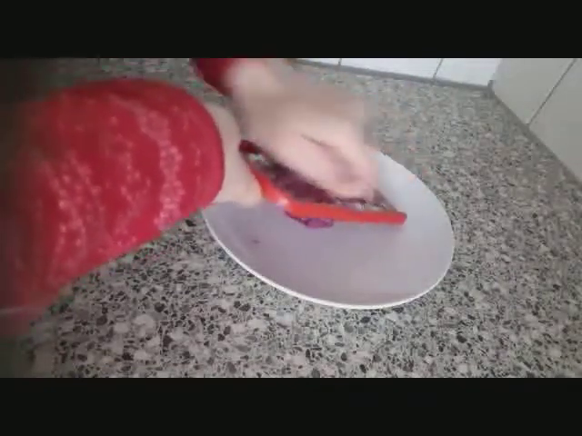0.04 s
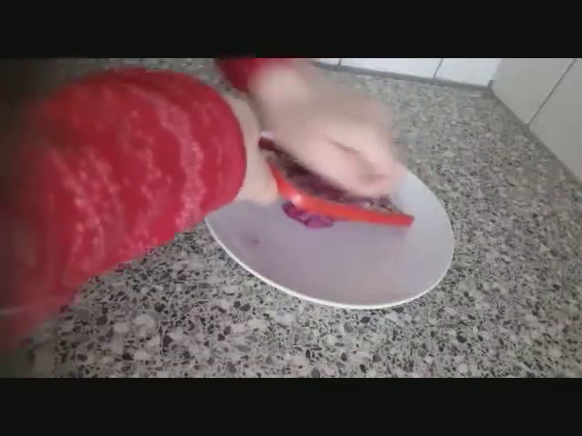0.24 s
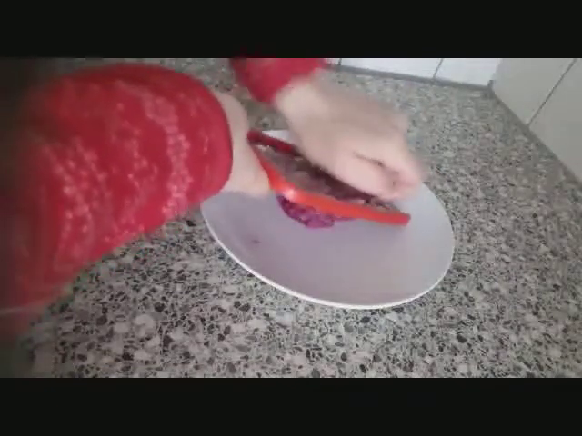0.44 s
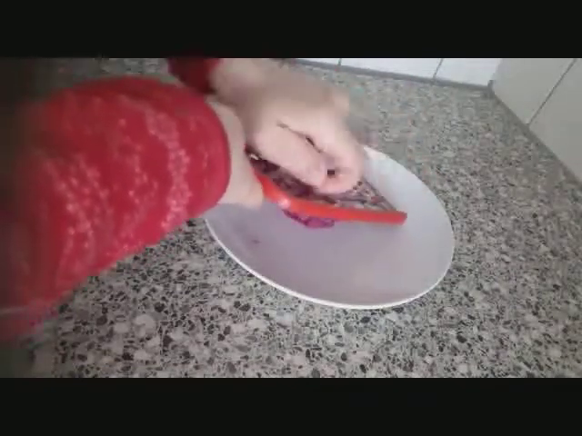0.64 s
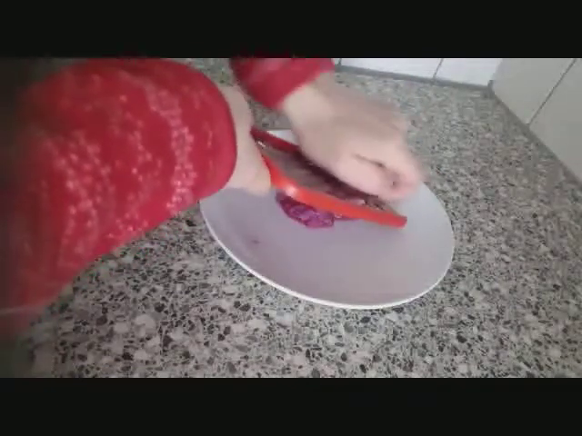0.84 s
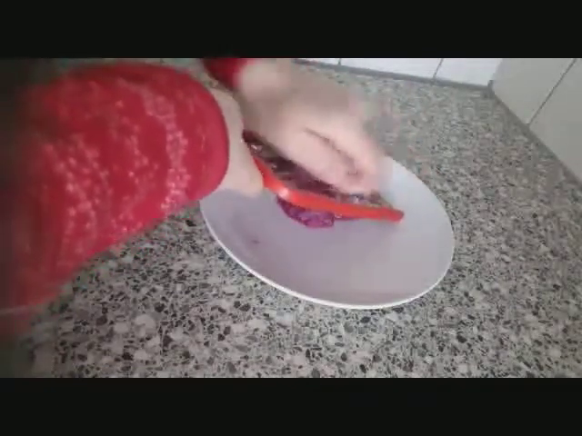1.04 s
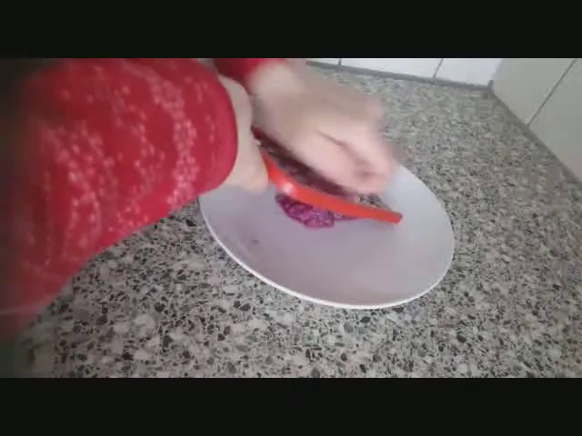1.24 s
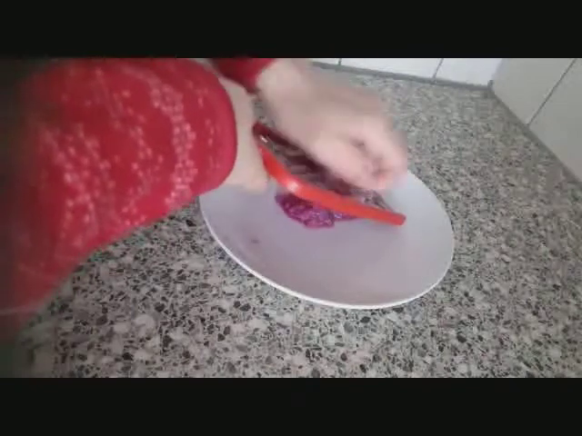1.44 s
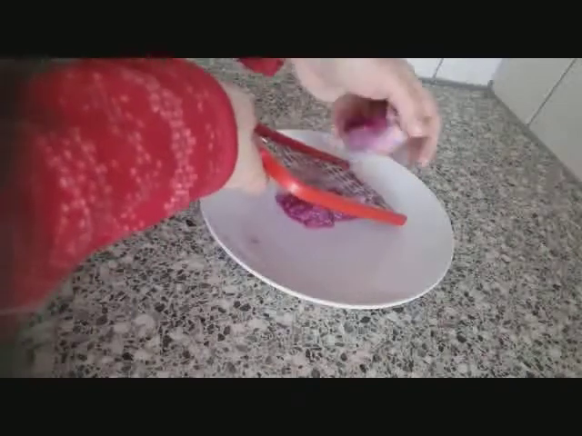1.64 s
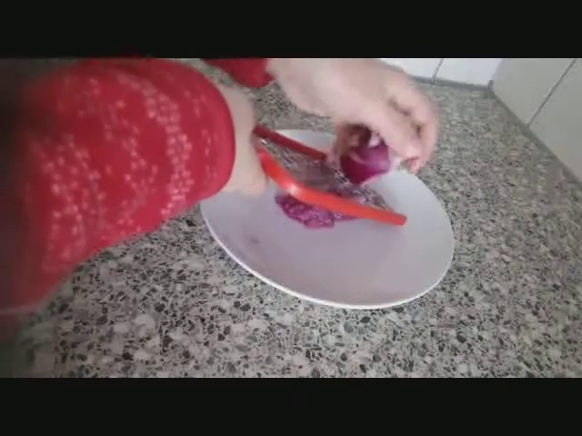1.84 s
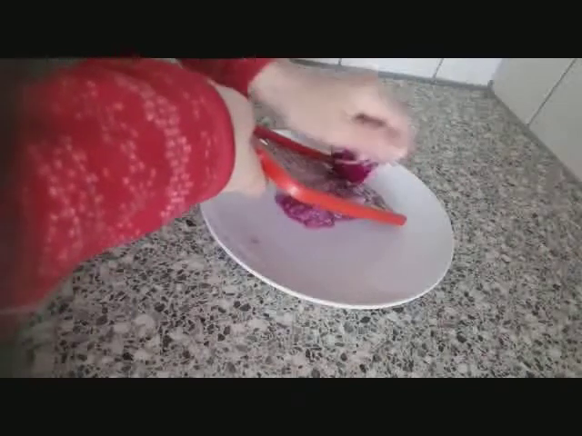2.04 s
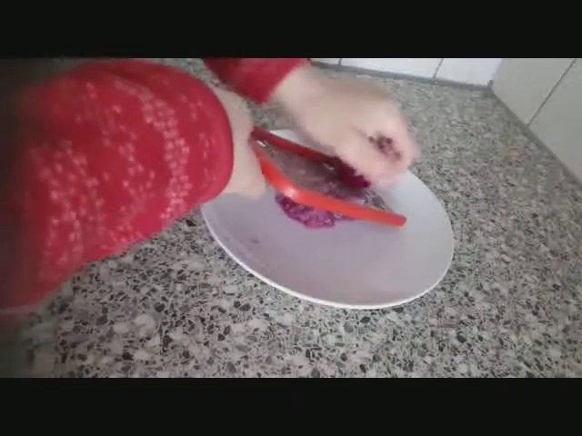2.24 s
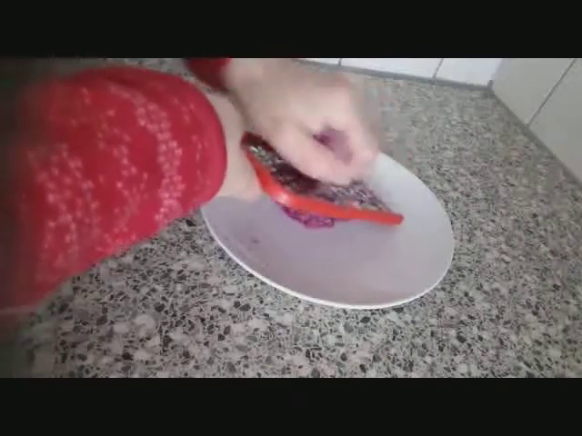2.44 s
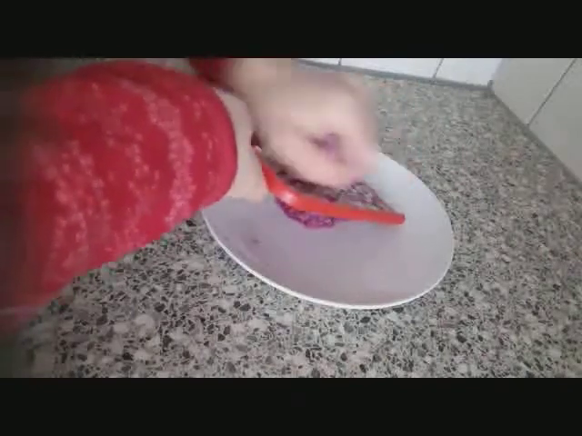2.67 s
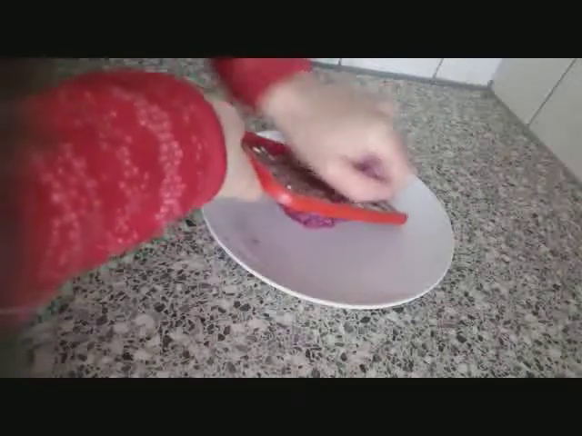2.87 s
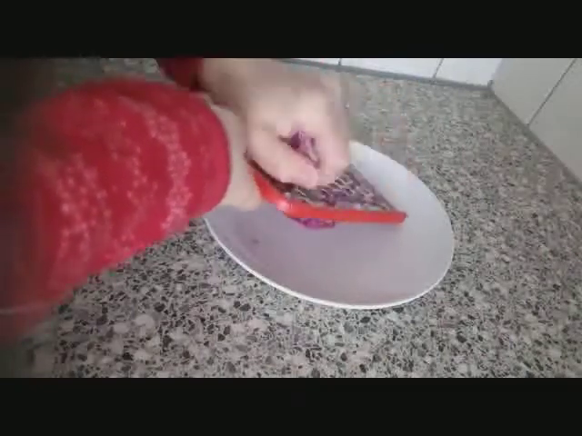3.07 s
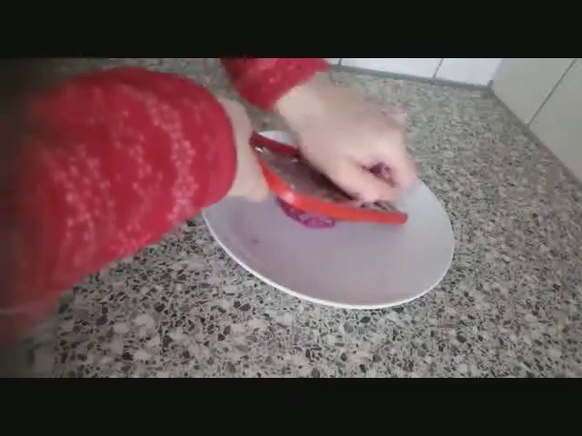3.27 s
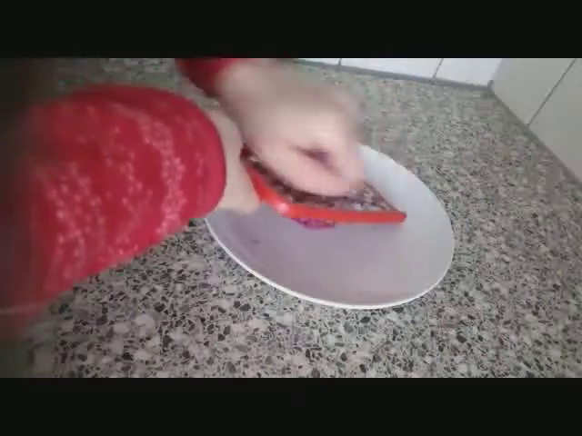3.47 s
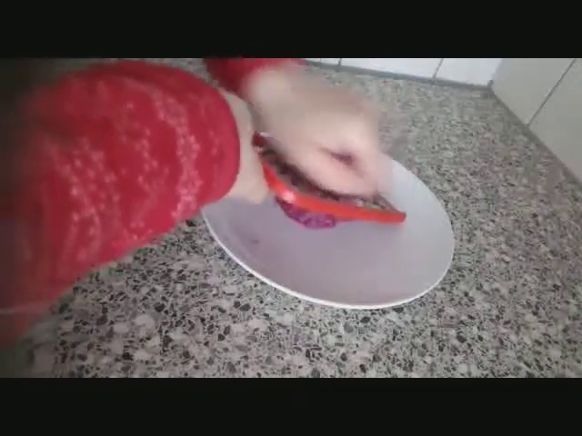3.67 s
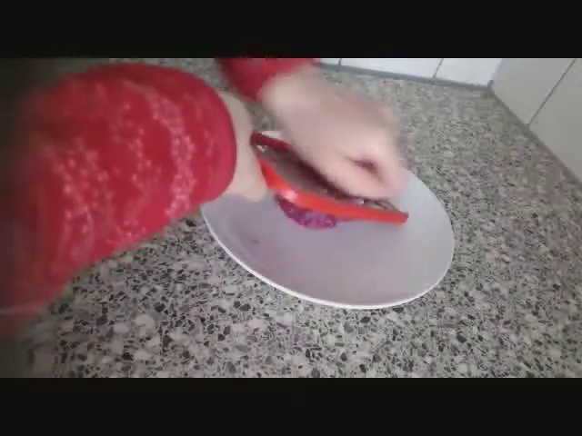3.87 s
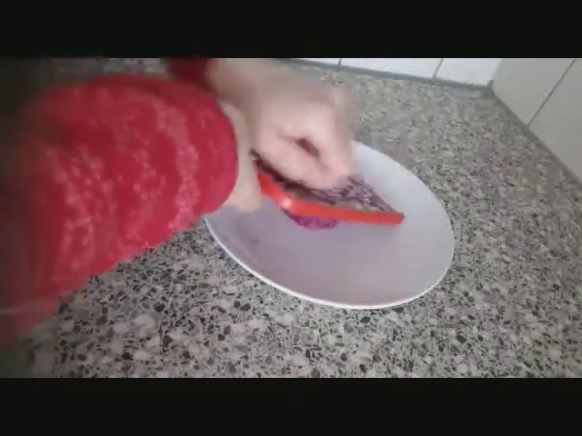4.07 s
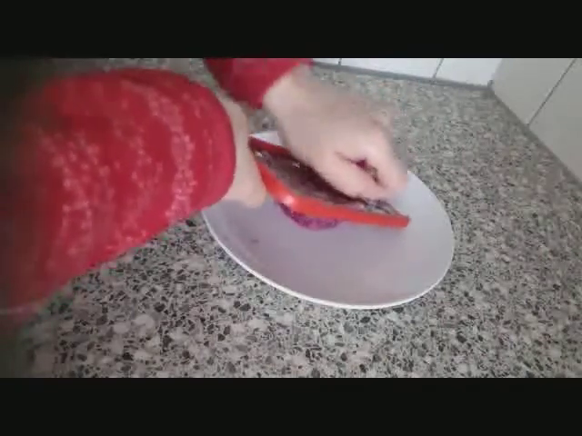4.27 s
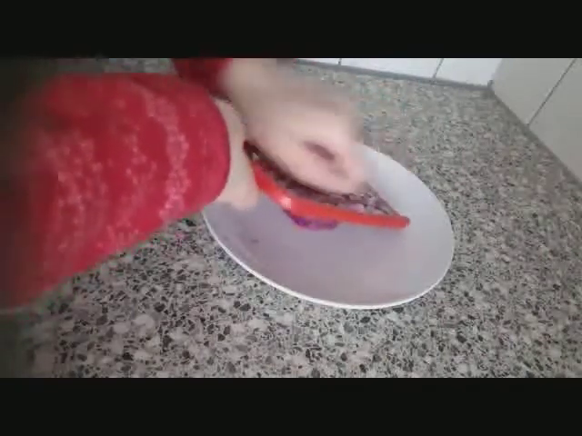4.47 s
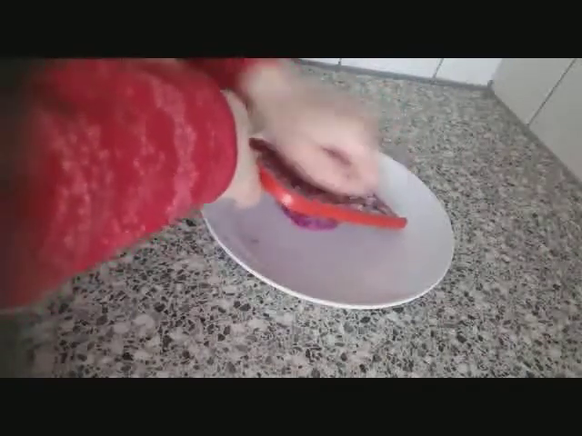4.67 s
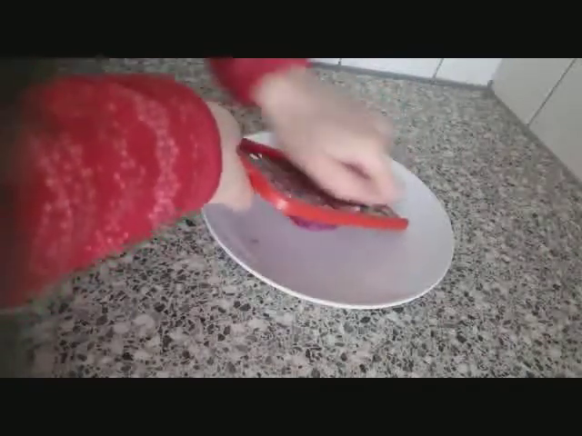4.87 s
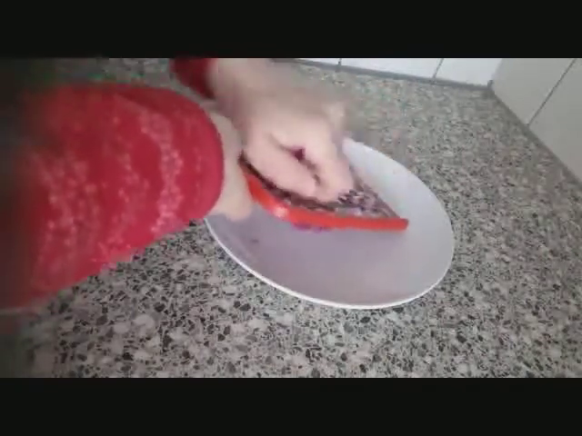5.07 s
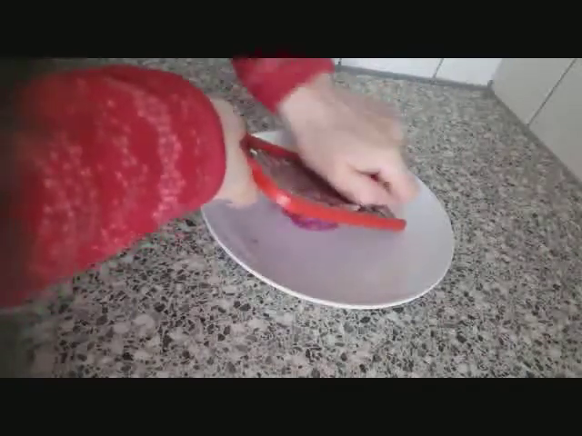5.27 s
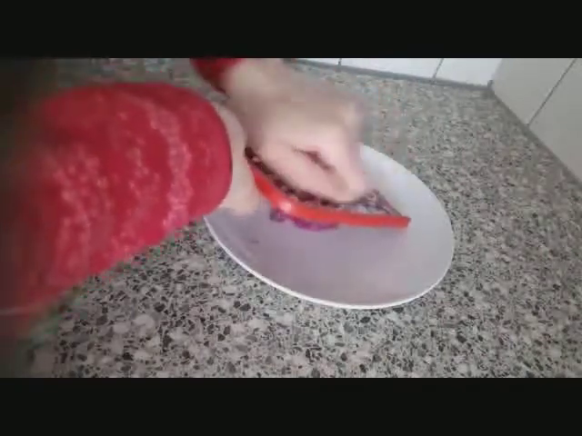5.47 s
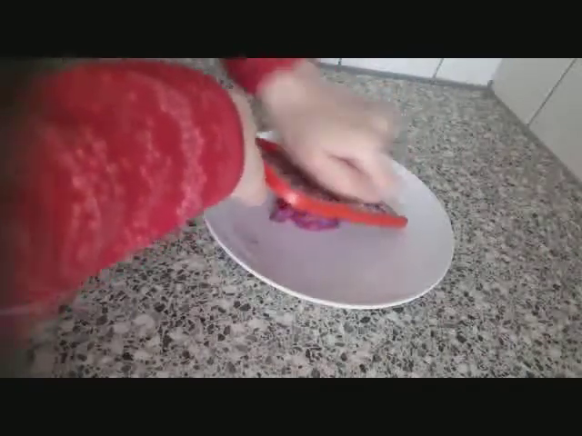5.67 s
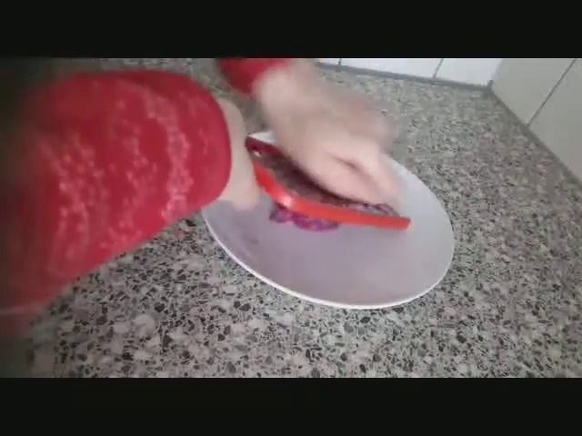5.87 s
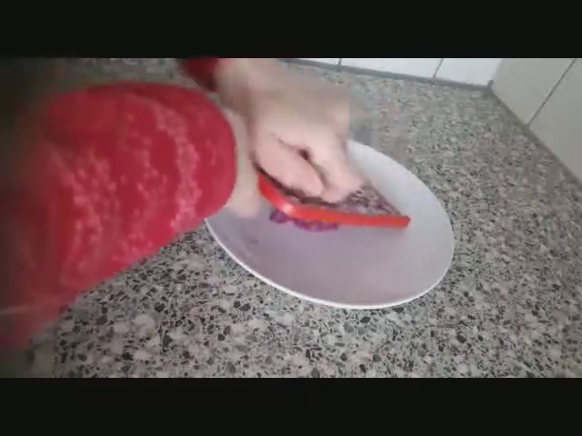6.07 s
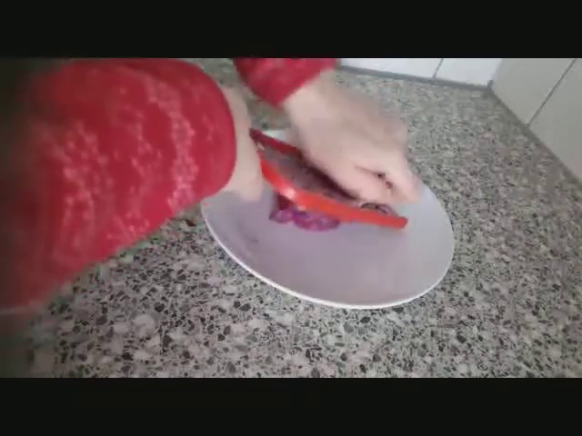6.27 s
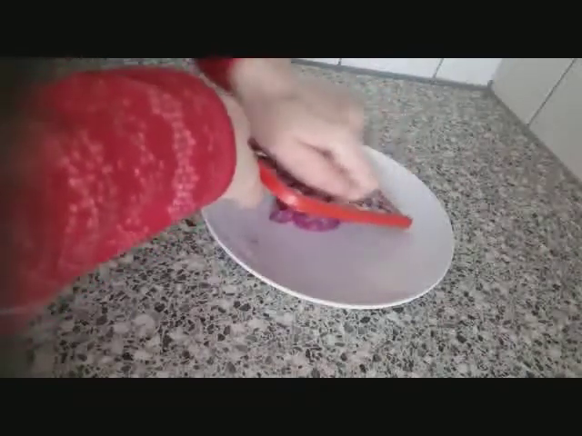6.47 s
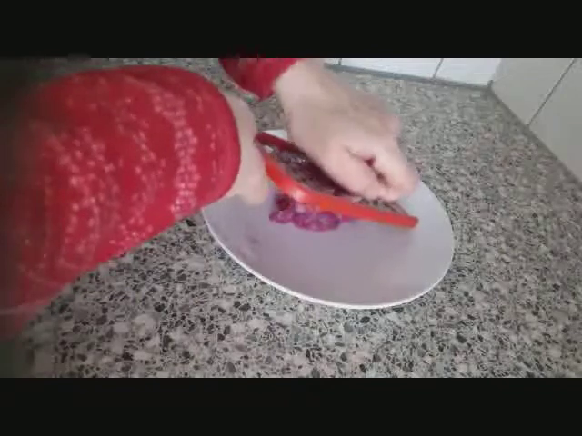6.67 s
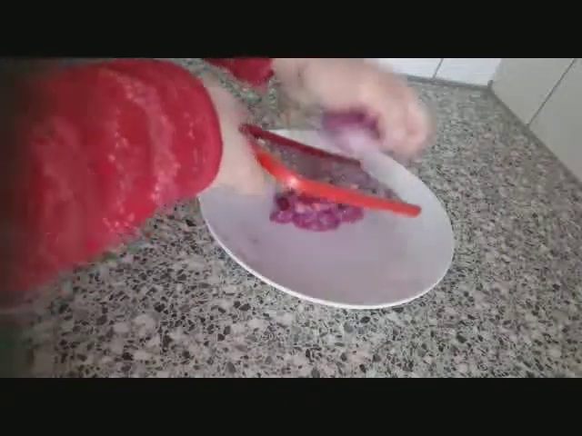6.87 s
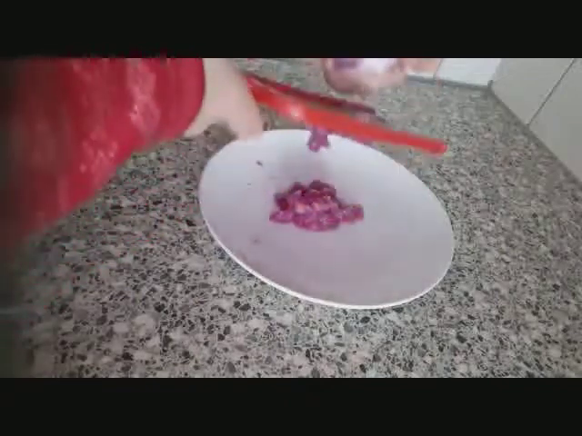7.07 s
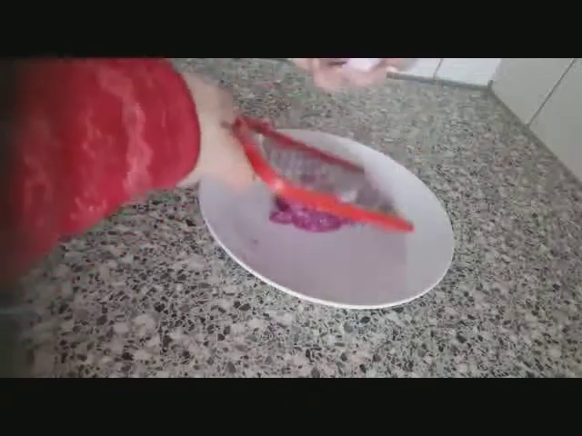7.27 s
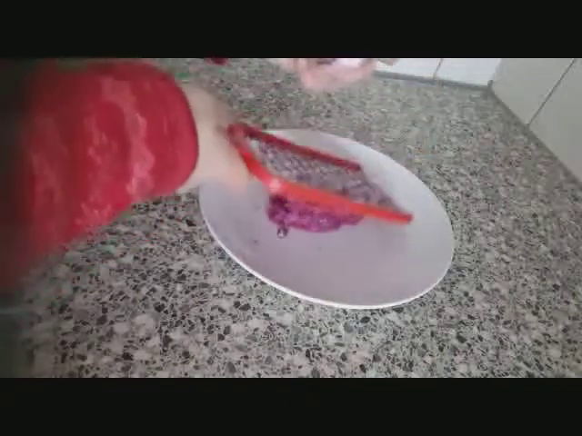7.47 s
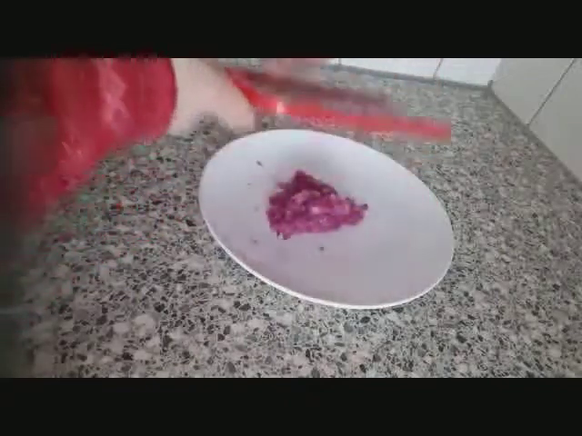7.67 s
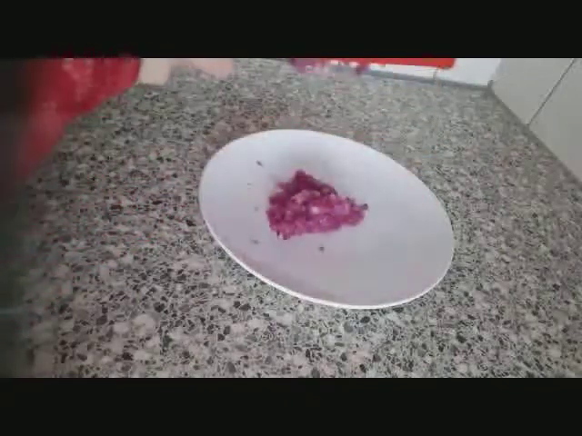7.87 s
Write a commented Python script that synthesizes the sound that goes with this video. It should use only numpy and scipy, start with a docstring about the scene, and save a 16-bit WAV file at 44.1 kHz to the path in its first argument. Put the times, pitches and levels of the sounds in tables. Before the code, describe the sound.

In a small, hard-walled kitchen, close wet rasping strokes run back and forth as an onion is grated over a plate, with a low shudder underneath. After a short break with a few tiny ticks, a longer run of grating follows. It stops with a soft bump, and the grater clacks twice on the briefly ringing plate, over a faint household rumble and hiss.

```python
"""A dense, wet rasp, to and fro, close to the microphone: an onion on a flat grater in a small hard kitchen.
The teeth tear the flesh while the rows of holes make the grater judder, along with the plate it rests on
and the stone counter below. The onion is turned in a pause, with small wet ticks, and the grating goes on.
At the end comes a soft bump, then the grater is knocked twice on the plate.
A short echo follows it all, over a low household rumble and hiss."""
import sys
import numpy as np
from scipy import signal
from scipy.fft import rfft, irfft
from scipy.io import wavfile

SR = 44100
rng = np.random.default_rng(int(sys.argv[2]) if len(sys.argv) > 2 else 0)


def unload_wav(signal):
    """Save mono or channel-first audio to the path in sys.argv[1] as 16-bit WAV at rate SR, clipped to [-1, 1]."""
    wavfile.write(
        sys.argv[1],
        SR,
        np.round(np.clip(np.atleast_2d(signal).T, -1, 1) * 32767).astype(np.int16),
    )


N = 348831


def from_db(db):
    return 10 ** (np.asarray(db) / 20)


def unit_rms(x):
    return x / np.sqrt(np.mean(x ** 2) + 1e-20)


def in_time(rows):
    """Rows led by a time become columns that glide from sample to sample."""
    times, *columns = np.transpose(rows)
    return [np.interp(np.arange(N) / SR, times, column) for column in columns]


def at_hz(points, hz):
    """A curve's value at a frequency, on a log axis."""
    return np.interp(np.log(hz), np.log(np.array(points)[:, 0]), np.array(points)[:, 1])


def butter(x, hz, kind="band", order=2):
    return signal.sosfilt(signal.butter(order, hz, kind, fs=SR, output="sos"), x)


def drift(rate_hz):
    """Random wavering of RMS 1: noise twice through a one-pole low-pass."""
    pole = np.exp(-2 * np.pi * rate_hz / SR)
    return unit_rms(signal.lfilter([1], [1, -2 * pole, pole * pole], rng.standard_normal(N + SR))[SR:])


def colour(x, spectrum):
    """Minimum-phase filter that follows a curve of (Hz, dB) points."""
    cepstrum = irfft(np.log(from_db(at_hz(spectrum, np.linspace(1, SR / 2, 4097)))))
    cepstrum[1:4096] *= 2
    cepstrum[4097:] = 0
    impulse = irfft(np.exp(rfft(cepstrum)))
    return signal.fftconvolve(x, np.atleast_2d(impulse), axes=-1)[:, :N]


def grains(per_s, uneven_db):
    """Random clicks of uneven size, in two channels that share the moments but not the signs."""
    sizes = from_db(uneven_db * np.minimum(rng.exponential(1, N), 5))
    fires = rng.random(N) < per_s / SR
    return sizes * fires * rng.standard_normal((2, N)) + 1e-18


def ring(clicks, modes, scatter_db=0.):
    """Clicks set damped modes ringing; with scatter, each strikes each mode with its own strength."""
    out, hits = 0, np.flatnonzero(np.abs(clicks) > 1e-12)
    for hz, level_db, t60 in modes:
        decay, angle = from_db(-60 / (t60 * SR)), 2 * np.pi * hz / SR
        struck = clicks * from_db(level_db) + 1e-18
        if scatter_db:
            struck[hits] *= from_db(scatter_db * rng.standard_normal(len(hits)))
        out = out + signal.lfilter([0, np.sin(angle)], [1, -2 * decay * np.cos(angle), decay ** 2], struck)
    return out


# How alike the microphone's two sides are. Each row: frequency in Hz, correlation (below 0 counts as 0).
MIC_LIKENESS = [(60, 1), (180, 0.98), (550, 0.72), (1650, 0.097), (4970, 0.36), (15000, -0.35)]
# The balance at the microphone. Each row: frequency in Hz, left minus right in dB.
MIC_BALANCE = [(60, 6.5), (120, -2), (240, -1.5), (480, -2), (950, 0), (1890, 0), (3770, -1), (7520, 1.5),
               (15000, -6)]


def spread(pair):
    """Two unrelated signals become left and right, alike in the bass and less so higher up."""
    hz = np.linspace(1, SR / 2, N // 2 + 1)
    alike = np.clip(at_hz(MIC_LIKENESS, hz), 0, 1)
    lean = from_db(at_hz(MIC_BALANCE, hz) / 2)
    mid, side = rfft(pair) * np.sqrt([(1 + alike) / 2, (1 - alike) / 2])
    return irfft([(mid + side) * lean, (mid - side) / lean], N)


# The rumble and the hiss of the house. Each row: frequency in Hz, relative level in dB.
RUMBLE_SPECTRUM = [(24, -48.5), (40, -18.5), (113, 3), (183, -18), (241, -0.5), (269, -19), (310, -10.5),
                   (399, -23), (614, -28.5), (700, -35), (910, -65), (1540, -120)]
HISS_SPECTRUM = [(350, -28.5), (600, -5.5), (661, -21), (858, -6.5), (1140, -14), (2090, -1), (2310, -14),
                 (2950, -19.5), (3940, -14.5), (4910, -3), (5790, -11.5), (6920, -3), (8270, -31),
                 (12300, -13.5), (16000, -12)]
# Their rise and fall. Each row: time in seconds, rumble level in dB, hiss level in dB.
ROOM_LEVELS = [(0, -45, -44), (1.6, -63.5, -61), (1.8, -54.5, -59.5), (2.0, -53, -58), (2.2, -61, -60.5),
               (6.8, -55.5, -60.5), (6.95, -57, -57.5), (7.15, -59.5, -62.5), (7.7, -64, -65.5),
               (7.9, -61, -65)]


def room_tone():
    """All around the microphone, a low household rumble that wavers and a steadier hiss."""
    rumble_db, hiss_db = in_time(ROOM_LEVELS)
    rumble = unit_rms(spread(colour(rng.standard_normal((2, N)), RUMBLE_SPECTRUM)))
    hiss = unit_rms(spread(colour(rng.standard_normal((2, N)), HISS_SPECTRUM)))
    return from_db(rumble_db + 4.3 * drift(16)) * rumble + from_db(hiss_db + .8 * drift(5.4)) * hiss


# The kitchen's echo. Each row: frequency in Hz, seconds to fade by 60 dB.
KITCHEN_DECAY = [(100, 0.3), (1000, 0.29), (5000, 0.26), (12000, 0.26)]
FIRST_ECHO_S = 0.0072


def kitchen_echo(x):
    """Off hard walls nearby, echoes thicken at once into noise that dies octave by octave."""
    t, tail = np.arange(SR // 2) / SR, 0
    mid, side = rng.standard_normal((2, len(t)))
    for low_hz in 62.5 * 2 ** np.arange(8):
        centre_hz = low_hz * np.sqrt(2)
        alike = np.clip(at_hz(MIC_LIKENESS, centre_hz), 0, 1)
        pair = np.sqrt(1 + alike) * mid + np.sqrt(1 - alike) * side * [[1], [-1]]
        fade = from_db(-60 * t / at_hz(KITCHEN_DECAY, centre_hz))
        tail = tail + butter(pair, [low_hz, 2 * low_hz]) * fade
    tail = tail * (t > FIRST_ECHO_S)
    return signal.fftconvolve(x[None], tail / np.sqrt(np.sum(tail ** 2) / 2), axes=-1)[:, :N]


# Modes of the plate, of plate and grater rocking on the counter, and of the stone counter itself.
# Each row: frequency in Hz, relative level in dB, seconds to fade by 60 dB.
PLATE_MODES = [(780, -23, 0.28), (815, -25, .12), (965, -22, 0.12), (1330, -19.5, .1), (1647, -15, .12),
               (2030, -4.5, 0.056), (2621, -9, 0.17), (2640, -12.5, .12), (2880, -13, .07),
               (3395, -16, .08), (3708, -8.5, .08), (4290, -12, .08), (4420, -8, .15), (4504, -9, .13),
               (4556, -7, .14), (4614, -10, .11), (4750, -17, .08), (4975, -11, .1), (5290, -17.5, .08),
               (5550, -18.5, .08), (6186, -11, 0.08), (6244, -9, .14), (6295, -13, 0.11), (6650, -20, .06),
               (6900, -26, .08), (8360, -33, .1)]
ROCKING_MODES = [(104.2, 3, 0.17), (222, -7, 0.032), (333, -8, 0.046), (404.4, -9.5, 0.049),
                 (525.2, -17, 0.096)]
COUNTER_MODES = [(190, 1.5, 0.017), (298.5, -0.5, 0.11), (435.5, -2, 0.057)]
# The crack of grater on plate. Each row: frequency in Hz, relative level in dB.
CRACK_SPECTRUM = [(180, -35.5), (300, -2.5), (801, -6), (1460, -10.5), (1640, -29), (1780, -10), (3640, -4),
                  (5700, -2.5), (6200, 1), (8500, -31), (16000, -27.5)]
# The grater's knocks and bounces, close up. Each row: start in seconds, relative levels of ring,
# crack and thump in dB, hardness in Hz, left minus right in dB.
KNOCK_HITS = [(2.234, -39, -43, -38, 3000, -1), (6.868, 6, -38, -53, 260, -1.5),
              (7.231, -5, -13.5, -29, 12000, 7), (7.2368, -4, -10, -22.5, 16000, -2),
              (7.4613, -5.5, -14, -26, 15900, -6), (7.4635, -22, -12, -21.5, 8500, 3),
              (7.469, -19, -17.5, -20, 7500, -2.5)]


def knocks():
    """Each contact, longer for a soft blow, cracks, rings the plate and thumps into the counter."""
    blows, thumps, cracks = np.zeros(N), np.zeros(N), np.zeros((2, N))
    t = np.arange(SR // 10) / SR
    noises = rng.standard_normal((len(KNOCK_HITS), 2, len(t)))
    for (start, ring_db, crack_db, thump_db, hardness_hz, _), noise in zip(KNOCK_HITS, noises):
        i = round(start * SR)
        contact = (t + 1 / SR) * np.exp(-2 * np.pi * hardness_hz * t)
        pulse = contact / contact.sum()
        noise[:, 0] = 1.3   # the first touch is one sharp click
        burst = signal.fftconvolve(noise * np.exp(-t / 0.0034), pulse[None], axes=-1)[:, :len(t)]
        blows[i:i + len(t)] += from_db(ring_db) * pulse
        cracks[:, i:i + len(t)] += from_db(crack_db) * burst
        thumps[i] = from_db(thump_db)
    clack = from_db(-13.5) * ring(blows, PLATE_MODES) + from_db(17.5) * colour(cracks, CRACK_SPECTRUM)
    thud = ring(thumps, ROCKING_MODES) + ring(thumps, COUNTER_MODES)
    return butter(clack, 95, "high"), butter(thud, 95, "high")   # small bodies radiate no deep bass


# Close to the microphone: wet ticks as the onion is turned, sharp bites within strokes,
# and the small click of the grater's soft bump on the plate.
# Each row: start in seconds, peak level in dB, pitch in Hz, peak level of the snap in dB.
SMALL_TICKS = [(1.9035, -51, 2060, -54), (2.002, -38, 5630, -44), (2.011, -54, 3980, -46),
               (2.217, -51, 4850, -59), (2.2308, -41, 4680, -37), (2.2559, -44, 4700, -44),
               (2.3303, -38, 2350, -22), (2.6749, -26, 4500, -30), (4.5638, -12, 4300, -24),
               (5.3985, -18, 4570, -9), (5.7135, -25, 4300, -23), (6.8699, -42.5, 1900, -51)]
TICK_DECAY_S, SNAP_DECAY_S, SNAP_FROM_HZ = 0.0098, 0.0014, 1600


def small_ticks():
    """Each tick is a few milliseconds of noise around its pitch, headed by a short bright snap."""
    out, t = np.zeros(N), np.arange(SR // 10) / SR
    for start, tick_db, hz, snap_db in SMALL_TICKS:
        noise = rng.standard_normal(len(t))
        burst = butter(noise * np.exp(-t / TICK_DECAY_S), [hz / 1.46, min(hz * 1.33, SR / 3)])
        snap = butter(noise * np.exp(-t / SNAP_DECAY_S), SNAP_FROM_HZ, "high")
        for part, peak_db in (burst, tick_db), (snap, snap_db):
            out[round(start * SR):][:len(t)] += from_db(peak_db) * part / np.abs(part).max()
    return out


# The onion's strokes, to and fro in turn. A crest is the share of a stroke (0-1) where a layer peaks.
# Each row: start in seconds, length in seconds, rasp crest, rasp level in dB, juice spray and frame
# scrape in dB relative to the rasp, pitch of the free blade in Hz, judder crest, judder level in dB,
# rocking crest, rocking level in dB.
ONION_STROKES = [(-0.08, 0.13, 0.58, -28, -9, -5.5, 4500, 0.44, -35.5, 0.76, -35.5),
                 (0.052, 0.19, 0.61, -28.5, -10.0, -8, 4530, 0.56, -39, 0.5, -34.5),
                 (0.264, 0.12, 0.53, -28, -11, -4, 4300, 0.38, -30, 0.57, -34.1),
                 (0.385, 0.18, 0.61, -27.5, -10.5, -5, 4250, 0.71, -29, 0.56, -37.5),
                 (0.576, 0.14, 0.58, -29.5, -10.5, -4.5, 4500, 0.51, -33.5, 0.32, -30),
                 (0.725, 0.16, 0.65, -26.5, -12, -7, 4460, 0.63, -33, 0.3, -40),
                 (0.908, 0.15, 0.59, -31, -9, -2.5, 4520, 0.57, -31.5, 0.54, -33.5),
                 (1.058, 0.17, 0.59, -29, -10.9, -4.5, 4580.0, 0.67, -33, 0.6, -31.9),
                 (1.236, 0.15, 0.53, -31, -9, -4.5, 4530.0, 0.48, -31, 0.53, -37),
                 (1.397, 0.13, 0.44, -40.5, -10.5, -6, 4740.0, 0.58, -47, 0.44, -48),
                 (2.202, 0.086, 0.76, -42, -3.5, -5.5, 4720.0, 0.67, -41.5, 0.4, -30),
                 (2.304, 0.17, 0.51, -30, -6.5, -9, 4820.0, 0.43, -31, 0.36, -31.5),
                 (2.467, 0.17, 0.67, -26.5, -9, -9.5, 3920, 0.54, -33, 0.57, -33),
                 (2.634, 0.19, 0.6, -28, -8.5, -12, 4540, 0.56, -34, 0.7, -29.5),
                 (2.816, 0.18, 0.57, -25.5, -9.5, -8, 4380, 0.53, -27, 0.55, -25),
                 (3.004, 0.15, 0.51, -29, -8.5, -11, 4370, 0.39, -33, 0.65, -29.5),
                 (3.135, 0.19, 0.6, -24.5, -10, -7, 3970, 0.69, -27, 0.59, -27),
                 (3.335, 0.15, 0.53, -27.5, -8.5, -11.5, 4040, 0.35, -33, 0.5, -34),
                 (3.478, 0.19, 0.63, -26.0, -9.5, -6.5, 4200, 0.66, -31, 0.42, -30),
                 (3.685, 0.14, 0.47, -30, -8, -11.5, 4700.0, 0.39, -31, 0.36, -33.5),
                 (3.819, 0.18, 0.66, -25.5, -10.5, -6.5, 3660, 0.69, -31, 0.57, -25.5),
                 (4.014, 0.15, 0.56, -29.5, -7.5, -10.5, 4000, 0.43, -34.5, 0.37, -36),
                 (4.157, 0.18, 0.66, -28.5, -10.5, -10, 4150.0, 0.67, -35.1, 0.73, -30.5),
                 (4.357, 0.14, 0.51, -32.5, -8, -10.5, 4420.0, 0.38, -35, 0.47, -31),
                 (4.481, 0.18, 0.59, -28.5, -10, -7.5, 4160, 0.59, -30.5, 0.68, -29),
                 (4.673, 0.15, 0.6, -30, -9.5, -10, 4240, 0.46, -34.5, 0.8, -32),
                 (4.808, 0.21, 0.59, -29, -9.5, -7, 4300, 0.65, -33, 0.58, -36),
                 (5.018, 0.15, 0.5, -30, -8, -12.5, 4520.0, 0.39, -32.5, 0.47, -31),
                 (5.149, 0.19, 0.66, -26, -9.5, -7.5, 4350.0, 0.73, -33, 0.73, -31),
                 (5.339, 0.16, 0.45, -27, -8, -10, 4460.0, 0.26, -30.5, 0.36, -31),
                 (5.483, 0.19, 0.66, -27, -10, -5.5, 4200.0, 0.75, -33.1, 0.62, -31.5),
                 (5.681, 0.16, 0.48, -27.5, -9.5, -10, 4210.0, 0.47, -34.5, 0.5, -32),
                 (5.831, 0.18, 0.61, -30, -9.5, -6, 4650, 0.67, -32.5, 0.52, -31.5),
                 (6.018, 0.14, 0.56, -29.5, -9, -9, 4240, 0.35, -34, 0.74, -34),
                 (6.152, 0.2, 0.61, -30, -8.5, -6.5, 4830, 0.64, -34, 0.6, -35),
                 (6.345, 0.14, 0.57, -29, -9.5, -10, 4240, 0.41, -31.5, 0.34, -30.5),
                 (6.491, 0.18, 0.53, -34.5, -10, -7.5, 4380, 0.66, -38, 0.68, -36),
                 (6.738, 0.2, 0.1, -57, -6, -11, 4700, 0.5, -67, 0.4, -73)]


def stroke_swells(crests, levels_db, powers, overlap_s, lag_s=0.):
    """Each stroke is a half sine bent to its crest; higher (rise, fall) powers make it more pointed."""
    energy, t = np.zeros(N), np.arange(N) / SR
    for (start, length, *_), crest, db in zip(ONION_STROKES, np.clip(crests, .15, .85), levels_db):
        begin, span = start - overlap_s + lag_s, length + 2 * overlap_s   # negative overlap stops short
        inside = slice(max(round(begin * SR), 0) + 1, round((begin + span) * SR))
        bent = np.clip((t[inside] - begin) / span, 0, 1) ** (np.log(.5) / np.log(crest))
        arc = np.abs(np.sin(np.pi * bent)) ** np.where(bent < .5, *powers)
        energy[inside] += (from_db(db) * arc) ** 2
    return np.sqrt(energy)


HOLE_ROWS_PER_S, ROCK_RING_S = 170, 0.004


def grater_judder():
    """Each row of holes bumps grater and plate; these heavier bodies answer late, shaking and rocking."""
    *_, judder_crest, judder_db, rock_crest, rock_db = np.transpose(ONION_STROKES)
    shake_swell = stroke_swells(judder_crest, judder_db, powers=(1.1, 1.7), overlap_s=-0.0057, lag_s=.012)
    rock_swell = stroke_swells(rock_crest, rock_db, powers=(1.5, 1.3), overlap_s=0.004, lag_s=.022)
    hold = np.exp(-1 / (ROCK_RING_S * SR))
    rock_swell = signal.lfilter([1 - hold], [1, -hold], rock_swell)   # rocking builds up and rings on
    rows_passed = np.cumsum(HOLE_ROWS_PER_S * from_db(3 * drift(15))) / SR
    new_row = np.diff(np.floor(rows_passed), prepend=0) > 0
    bumps = new_row * from_db(4.45 * np.clip(rng.standard_normal((2, N)), -2, 2))
    ringing = np.array([ring(channel, ROCKING_MODES[1:], scatter_db=3) for channel in bumps])
    thuds = signal.lfilter([1], [1, -.95], bumps)
    shake = unit_rms(butter(ringing + thuds, [130, 900]))
    rock_hz = ROCKING_MODES[0][0] * (1 + 0.0496 * drift(15))
    phase = 2 * np.pi * np.cumsum(rock_hz) / SR + rng.uniform(0, 2 * np.pi, (2, 1))
    rocking = np.sqrt(2) * np.sin(phase) * from_db(drift(36))
    heave = unit_rms(butter(rng.standard_normal((2, N)), [45, 82]))   # the counter yields to the arm
    return shake_swell * shake + rock_swell * rocking + from_db(-33) * np.sqrt(rock_swell) * heave


def blade_resonance(clicks, blade_hz):
    """Quarter-octave bands waver on their own; those near the pitch of the free blade stand out."""
    out, edges = 0, 1500 * 2 ** np.arange(0, 2.8, 1 / 4)
    for k, (low, high) in enumerate(zip(edges, edges[1:])):
        octaves_away = np.log2(np.sqrt(low * high) / blade_hz)
        gain = from_db(4.9 * np.exp(-(octaves_away / 0.39) ** 2) + 1.64 * drift(16.7))
        out = out + (-1) ** k * gain * butter(clicks, [low, high])   # alternate signs join bands evenly
    return out


# Close up on the grater: tearing cells, spraying juice and the scrape in the frame.
# Each row: frequency in Hz, relative level in dB.
TEAR_SPECTRUM = [(1060, -40.5), (1800, -16), (2080, -6.5), (3580, -4), (4160, -7.5), (4680, -6), (5920, -3),
                 (7590, -9), (8600, -29), (11200, -66), (18900, -120)]
SPRAY_SPECTRUM = [(5060, -65), (8600, -8.5), (12300, 0), (15100, 1), (16000, -9)]
SCRAPE_SPECTRUM = [(350, -22.5), (600, 1.5), (676, -4), (887, -2), (1200, -1), (1330, 4), (1760, -4.5),
                   (2200, -3), (2860, -2.5), (4840, -120)]
RASP_OVERLAP_S, SAG_HZ_PER_CREST, STEADY_CREST = -0.0018, 3000, 0.35


def onion_rasp():
    """Teeth tear cells by the thousand, in clumps as row after row bites; the plate hums along faintly."""
    columns = np.transpose(ONION_STROKES)
    start, length, crest, rasp_db, spray_db, scrape_db, blade_hz, judder_crest, *_ = columns
    t = np.arange(N) / SR
    stroke = np.clip(np.searchsorted(start, t) - 1, 0, None)
    from_middle = np.clip((t - start[stroke]) / length[stroke], 0, 1) - .5
    # the later the judder crests, the further the blade's pitch falls along the stroke
    sag_hz = SAG_HZ_PER_CREST * (judder_crest - STEADY_CREST)
    scrape_crest = crest + 0.64 * (judder_crest - crest)
    pressure = stroke_swells(crest, rasp_db, (0.99, 1), RASP_OVERLAP_S)
    spray_swell = stroke_swells(crest, rasp_db + spray_db, (0.75, 1.46), RASP_OVERLAP_S)
    scrape_swell = stroke_swells(scrape_crest, rasp_db + scrape_db, (1.12, 1), RASP_OVERLAP_S, lag_s=.0037)
    clumps_db = drift(25.1) + drift(315)
    cells = colour(grains(per_s=20000, uneven_db=0.26) * from_db(clumps_db), TEAR_SPECTRUM)
    teeth = unit_rms(blade_resonance(cells, blade_hz[stroke] - sag_hz[stroke] * from_middle))
    plate = unit_rms(np.diff([ring(channel, PLATE_MODES) for channel in cells], prepend=0))
    tearing = from_db(1.5) * teeth + from_db(-16.5) * plate
    droplets = grains(per_s=20000, uneven_db=0.94) * from_db(0.29 * clumps_db + drift(60))
    spray = unit_rms(colour(droplets, SPRAY_SPECTRUM))
    scratches = grains(per_s=6000, uneven_db=1.9) * from_db(0.14 * clumps_db + 1.8 * drift(38))
    scrape = unit_rms(colour(scratches, SCRAPE_SPECTRUM))
    return pressure * tearing + spray_swell * spray + scrape_swell * scrape


ECHO_DB, RIGHT_LATE_SAMPLES = -6, 3   # the grater stands a little nearer the microphone's left side


def scene():
    """Grating and knocks close to the microphone, the kitchen's echo behind, room tone under all."""
    clack, thump = knocks()
    left, right = spread(onion_rasp() + grater_judder()) + small_ticks()
    grating = np.array([left, np.roll(right, RIGHT_LATE_SAMPLES)])
    echo = kitchen_echo(grating.mean(axis=0) + from_db(4.5) * clack.mean(axis=0) + from_db(2.5) * thump)
    lean = from_db(in_time(KNOCK_HITS)[-1] / 2)   # clack and echo shift sides from knock to knock
    return grating + thump + (clack + from_db(ECHO_DB) * echo) * [lean, 1 / lean] + room_tone()


def record(dry):
    """At the microphone deep bass rolls off, peaks are rounded and the top is cut steeply."""
    thinned = butter(dry, 65, "high", order=3)
    rounded = .9 * np.tanh(thinned / .9)
    return signal.sosfilt(signal.ellip(16, .5, 100, 15950, fs=SR, output="sos"), rounded)


dry = scene()
out = record(dry)
unload_wav(out)
```